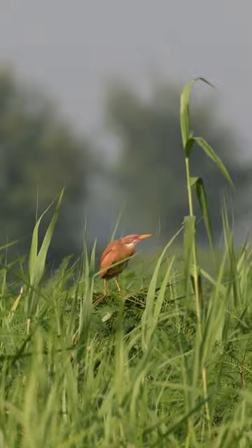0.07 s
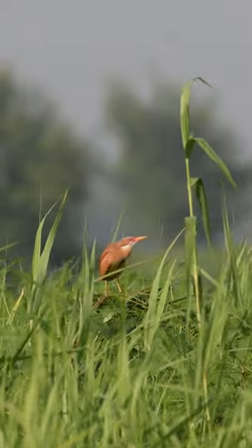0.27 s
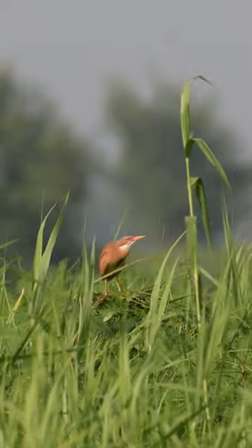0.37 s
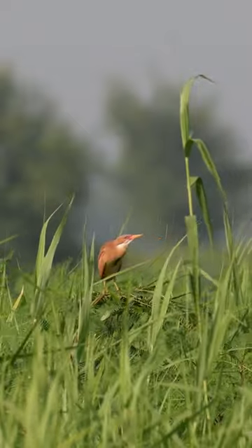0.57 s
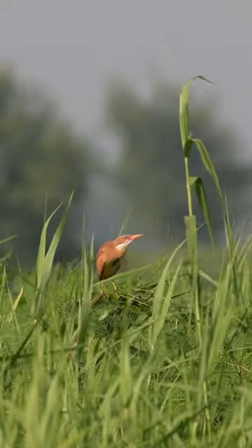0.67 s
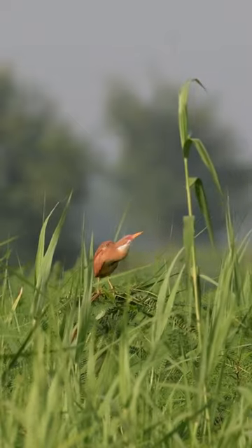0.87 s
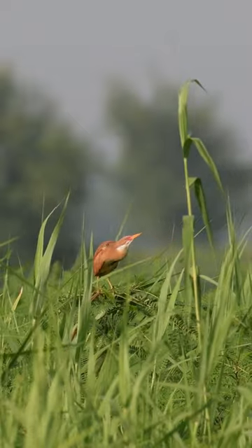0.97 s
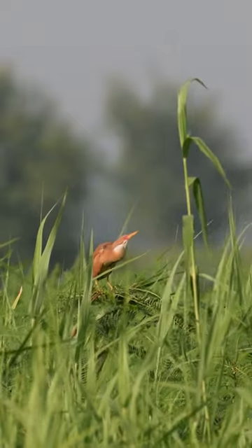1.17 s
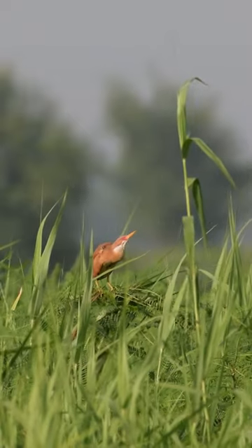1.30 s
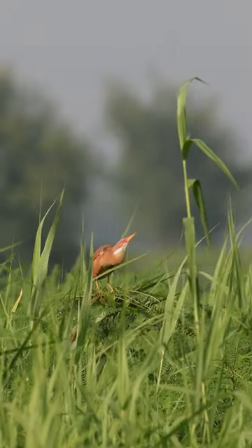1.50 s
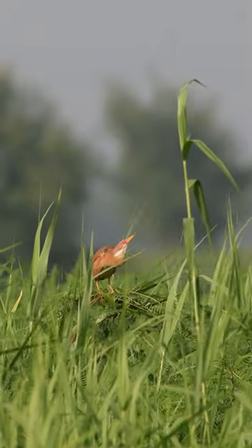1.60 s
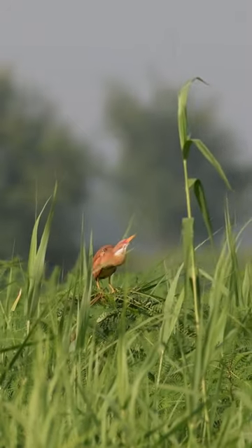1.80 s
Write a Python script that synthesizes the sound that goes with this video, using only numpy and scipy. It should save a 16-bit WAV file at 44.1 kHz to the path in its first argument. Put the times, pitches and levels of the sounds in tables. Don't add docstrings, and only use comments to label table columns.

```python
import sys
import numpy as np
from scipy import signal
from scipy.fft import rfft, irfft
from scipy.io import wavfile
from scipy.ndimage import uniform_filter1d, map_coordinates

SR = 44100
rng = np.random.default_rng(int(sys.argv[2]) if len(sys.argv) > 2 else 0)


def store_pcm(level_fs):
    pcm = np.round(np.clip(level_fs, -1, 1) * 32767).astype(np.int16)
    wavfile.write(sys.argv[1], SR, np.atleast_2d(pcm).T)


def magnitude_from_level(level_db):
    exponent = np.asarray(level_db, float) / 20
    return 10 ** exponent


N = 81585

# t/s of the low whistle, buzz level/dB, notes level/dB, whistle level/dB
WARBLER_PHRASES = [
    (0.3113, -41, -39, -39.5),
    (0.6414, -42.5, -39.5, -39.5),
    (.9680, -42.5, -39.5, -37.5),
    (1.2983, -43, -41.5, -33.5),
    (1.6260, -42, -39, -32.5),
    (1.9550, -41.5, -39, -36),
]
# t/s from the whistle, length/s, start f/Hz, end f/Hz, level/dB
CLOSING_PIPS = [
    (-.044, .005, 5150, 4600, 4),
    (-.038, .017, 6550, 6850, -3),
    (-.023, .005, 6950, 7350, 1),
    (.008, .004, 4400, 3650, -4),
    (.004, .012, 5750, 5700, -10),
    (.023, .004, 5200, 6100, -4),
    (.032, .005, 6000, 4900, 5),
    (.026, .012, 4650, 4800, -9),
    (.040, .012, 4400, 4350, -8),
]
# t/s, length/s, level/dB, fade/(dB/s)
CHATTER_CALLS = [
    (0.128, 0.16, -43, -94),
    (1.04, 0.14, -55.5, -16),
    (1.627, 0.076, -51, -40),
]
# t/s, level/dB
GUST_LEVEL = [(.075, -39.5), (.15, -41.5), (.23, -29.5), (.275, -44), (.305, -24.5), (.335, -27.5),
              (.36, -31), (.39, -23), (.45, -37.5), (.55, -37.5), (.68, -44.5), (.85, -50), (1.03, -53),
              (1.08, -43), (1.22, -51), (1.33, -43), (1.5, -52.5), (1.85, -55.5)]
# t/s, peak level/dB, f/Hz
WIND_BUFFETS = [(0.093, -25, 109), (0.164, -16.5, 123), (0.209, -13, 150), (0.25, -7.5, 127),
                (0.277, -12.5, 134), (0.313, -0.5, 158), (0.383, -1, 181), (0.4, -7, 177),
                (0.416, -40, 158), (0.429, -39, 141), (0.452, -12.5, 150), (0.562, -12, 105),
                (0.606, -12, 145), (0.65, -18, 120), (0.695, -16, 83), (0.741, -18.5, 86),
                (0.775, -18, 117), (0.797, -16, 81), (0.923, -21.5, 88), (0.994, -26, 94),
                (1.057, -18, 100), (1.123, -23, 85), (1.166, -27, 91), (1.256, -20.5, 104),
                (1.281, -22, 110), (1.32, -19, 93), (1.387, -34, 84.5), (1.431, -18, 98.5),
                (1.473, -36, 95), (1.635, -33, 132)]
# f/Hz, density level/(dB per Hz)
LEFT_HISS = [(40, -94), (200, -75.5), (800, -78.5), (1300, -86.5), (2200, -92), (4500, -87), (7000, -84.5),
             (16000, -104)]
# f/Hz, density level/(dB per Hz)
RIGHT_HISS = [(40, -75.5), (200, -74), (800, -85), (1300, -88), (2200, -90.5), (4500, -92.5), (8500, -98),
              (16000, -104)]
# f/Hz, sharpness Q
CAMERA_NOTCHES = [(2600, 3.6), (7720, 5.0), (7640, 7.0)]


def band(x, lo_hz, hi_hz):
    return signal.sosfilt(signal.butter(2, [lo_hz, min(hi_hz, .45 * SR)], "band", fs=SR, output="sos"), x)


def unit(x):
    return x / np.sqrt(np.mean(x ** 2))


def walk(rate_hz):
    k = max(int(SR / rate_hz), 2)
    return unit(uniform_filter1d(uniform_filter1d(rng.standard_normal(N), k), k))


def tone(hz):
    return np.sqrt(2) * np.sin(2 * np.pi * np.cumsum(hz) / SR)


def late(x, delay_s):
    return map_coordinates(x, [np.arange(N) - delay_s * SR], mode="nearest")


def gate(u, start_s, end_s, edge_s):
    return np.clip(np.minimum(u - start_s, end_s - u) / edge_s, 0, 1)


def ports(left_db, right_db):
    return magnitude_from_level(np.array([[left_db], [right_db]]))


def warbler(t):
    lead_start_s, buzz_start_s, buzz_end_s = -0.2594, -.2075, -.042
    arch_rate_hz, strong_share, tick_hz = 58.1, .58, 232.4
    whistle_start_s, whistle_s, whistle_hz, whistle_end_hz = -.014, .022, 4450, 4350
    high, low = np.zeros(N), np.zeros(N)
    jitter = walk(120)
    wobble_hz = 90 * walk(300)
    uneven_turn = 2 * np.pi * np.cumsum(1 + 0.0695 * walk(128.7)) / SR
    for at, buzz_db, pips_db, whistle_db in WARBLER_PHRASES:
        u = t - at
        cycle = arch_rate_hz * (u - buzz_start_s) % 1
        strong = cycle < strong_share
        along = np.where(strong, cycle / strong_share, (cycle - strong_share) / (1 - strong_share))
        arch = np.sin(np.pi * along ** 1.6) ** 0.55
        tick = 2 * np.pi * tick_hz * (u - buzz_start_s) + .5 * jitter
        rise_db = 4 * np.clip(u - buzz_end_s, -1, 0) / 0.48
        level = magnitude_from_level(buzz_db - 7 * ~strong + 9 * np.cos(tick - 1.5) + rise_db) * arch ** .6
        buzz = tone(4650 + 1850 * arch + wobble_hz)
        high += level * gate(u, buzz_start_s, buzz_end_s, 0.0014) * buzz

        lead = tone(5495 + wobble_hz + 514 * np.sin(tick))
        lead_level = magnitude_from_level(buzz_db - 5.5 + 6 * np.cos(tick))
        high += lead_level * gate(u, lead_start_s, buzz_start_s, 0.012) * lead

        for start, length, hz0, hz1, db in CLOSING_PIPS:
            p = np.clip((u - start) / length, 0, 1)
            pip = np.sin(np.pi * p) * tone(hz0 + (hz1 - hz0) * p + 0.426 * wobble_hz)
            high += magnitude_from_level(pips_db + db + 2.5 * np.cos(330 * uneven_turn)) * pip

        p = np.clip((u - whistle_start_s) / whistle_s, 0, 1)
        swell = np.sin(np.pi * p ** 2.5)
        low += magnitude_from_level(whistle_db) * swell * tone(whistle_hz + (whistle_end_hz - whistle_hz) * p ** 3)
    high *= magnitude_from_level(0.88 * walk(180))
    return warbler_at_ports(high, -4, -4.5) + warbler_at_ports(low, -11, -4)


def warbler_at_ports(x, wet_db, right_db):
    dipped = x - 0.79 * signal.lfilter(*signal.iirpeak(5400, 4.8, SR), x)
    direct = np.array([late(x, 0.000204), dipped])
    return (direct + reeds(x, wet_db)) * ports(0, right_db)


def chatterer(t):
    high_hz, low_hz, fall_s, swing_hz, trill_hz, sag_hz_s = 6500, 4450, .028, 350, 92, 3426
    out = np.zeros(N)
    turn = 2 * np.pi * trill_hz * np.cumsum(1 + 0.13 * walk(61.2)) / SR
    for at, length, db, fade_db_s in CHATTER_CALLS:
        u = np.clip(t - at, 0, None)
        fall = np.clip(u / fall_s, 0, 1) ** 1.7
        hz = high_hz + fall * (low_hz - high_hz + swing_hz * np.cos(turn))
        hz = hz + 150 * walk(203) - sag_hz_s * np.minimum(u, length)
        level = magnitude_from_level(db + fade_db_s * u + 3.45 * walk(140))
        out += level * gate(u, 0, length, 0.024) * tone(hz)
    return (out + reeds(out, -3)) * ports(0, -9)


def reeds(x, wet_db):
    t60_s, build_s = .14, 0.0024
    u = np.arange(8000) / SR
    tails = rng.standard_normal((2, len(u))) * magnitude_from_level(-60 * u / t60_s) * np.clip(u / build_s, 0, 1)
    return np.array([signal.fftconvolve(x, h / np.linalg.norm(h))[:N] * magnitude_from_level(wet_db) for h in tails])


def cricket(t):
    stroke_hz, ring_hz, sweep_hz, width_hz = 64.5, 9900, 296, 560
    turn = 2 * np.pi * np.cumsum(stroke_hz * (1 + 0.0192 * walk(4.4))) / SR
    rasp = band(rng.standard_normal((2, N)), 3, width_hz / 2)
    phase = 2 * np.pi * np.cumsum(ring_hz - sweep_hz * np.sin(turn)) / SR
    ring = rasp[0] * np.cos(phase) + rasp[1] * np.sin(phase)
    throb_db = -57.5 + 2.5 * np.cos(turn) + 0.5 * walk(2.5)
    return unit(band(ring, 9700, 10060)) * magnitude_from_level(throb_db) * ports(0, -22)


def turbulence(gust_db):
    low_hz, top_hz = 63, 227 * np.exp(.03 * (gust_db + 25))
    x = 0
    for hz in 25 * 2 ** np.arange(0, 5.1, .5):
        shape = 1 / np.sqrt(1 + (low_hz / hz) ** 4) / np.sqrt(1 + (hz / top_hz) ** 9)
        x = x + shape * band(rng.standard_normal(N), hz / 1.12, hz * 1.166)
    steady = x / np.sqrt(uniform_filter1d(x ** 2, size=9000))
    return steady * magnitude_from_level(gust_db + 10 + walk(29.48))


def wind(t):
    gust_db = np.interp(t, *np.transpose(GUST_LEVEL))
    left, right_own = turbulence(gust_db), turbulence(gust_db)
    for at, db, hz in WIND_BUFFETS:
        cycles = (t - at) * hz
        push = np.exp(-(cycles / 0.45) ** 2) * np.cos(2 * np.pi * cycles)
        left = left + magnitude_from_level(db - 1) * push * np.sign(rng.random() - .5)
    return np.array([late(left, .0004), magnitude_from_level(-25) * left + magnitude_from_level(-30) * right_own])


def hiss():
    log_hz = np.log(np.arange(N // 2 + 1) * SR / N + 1)
    out = []
    for curve in (LEFT_HISS, RIGHT_HISS):
        hz, db = np.transpose(curve)
        level = magnitude_from_level(np.interp(log_hz, np.log(hz), db))
        out.append(irfft(rfft(rng.standard_normal(N)) * level, N))
    return np.array(out) * np.sqrt(SR / 2)


def scene():
    t = np.arange(N) / SR
    return warbler(t) + chatterer(t) + cricket(t) + wind(t) + hiss()


def roll_off(x):
    return signal.sosfilt(signal.butter(12, 15910, fs=SR, output="sos"), x)


def record(dry):
    leak, top_hz, start_s = magnitude_from_level(-34), 15680, .0725
    for hz, q in CAMERA_NOTCHES:
        dry = leak * dry + (1 - leak) * signal.lfilter(*signal.iirnotch(hz, q, SR), dry)
    dry = signal.sosfilt(signal.ellip(10, .2, 60, top_hz, fs=SR, output="sos"), dry)
    mix = dry * (np.arange(N) >= start_s * SR)
    return roll_off(mix)


dry = scene()
out = record(dry)
store_pcm(out)
```